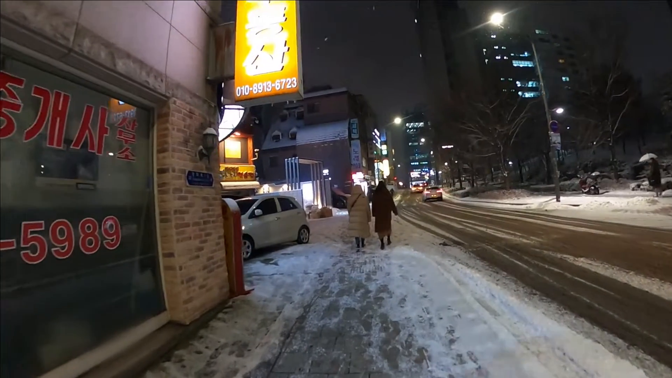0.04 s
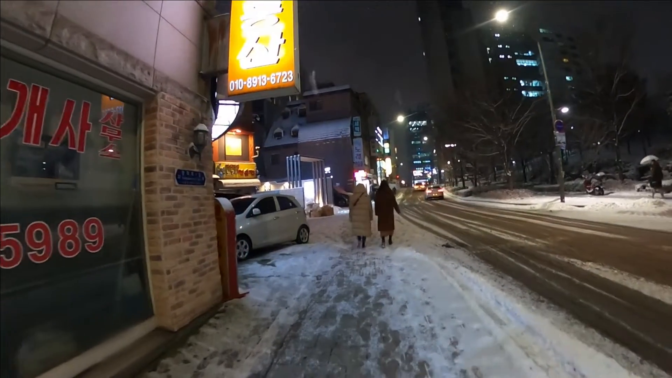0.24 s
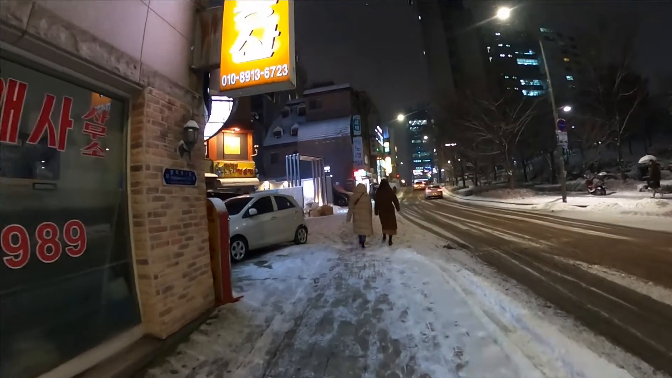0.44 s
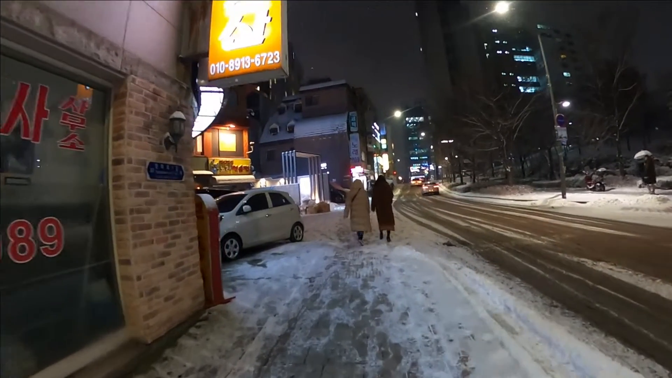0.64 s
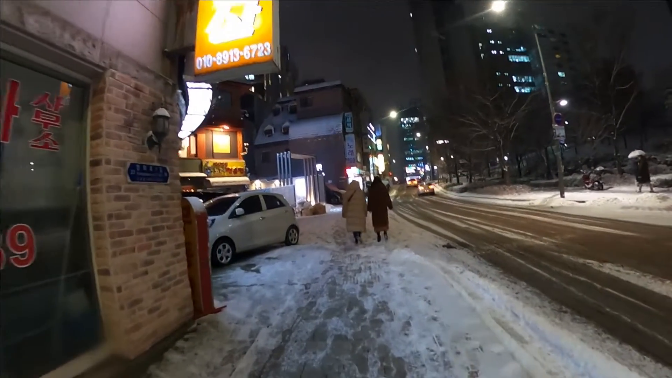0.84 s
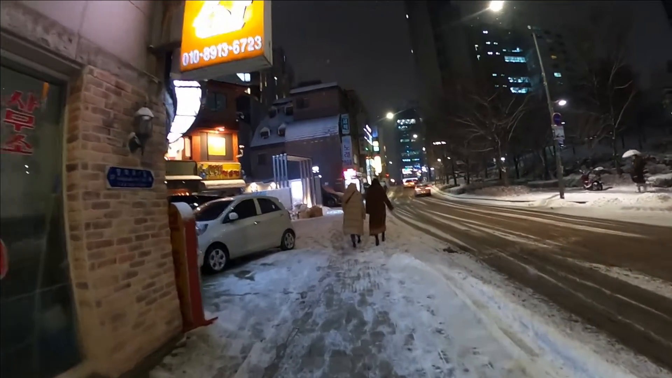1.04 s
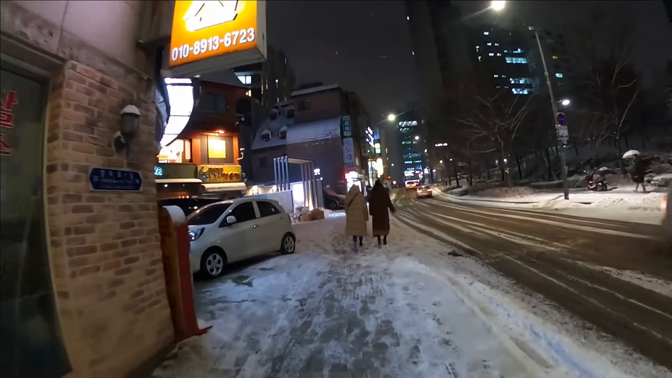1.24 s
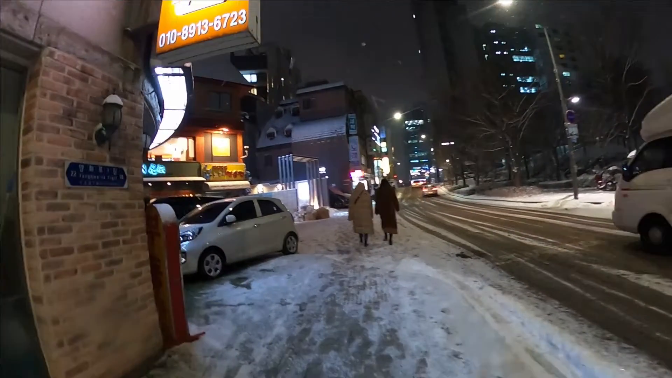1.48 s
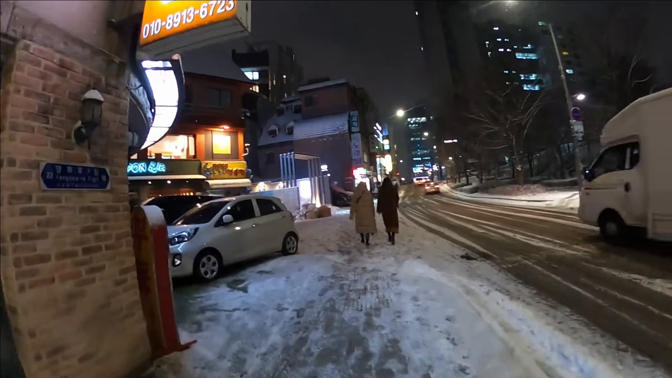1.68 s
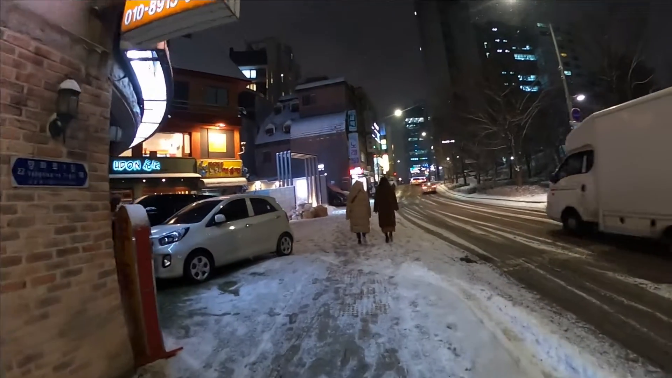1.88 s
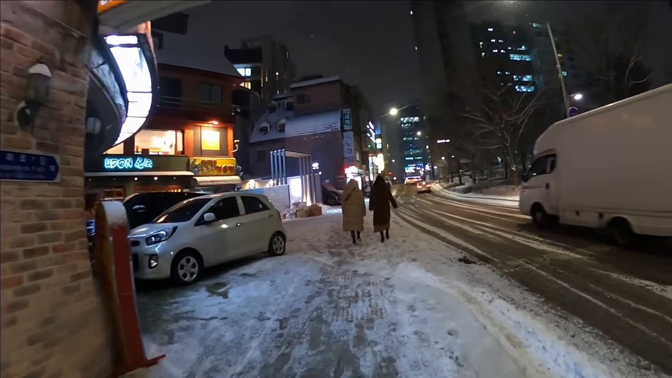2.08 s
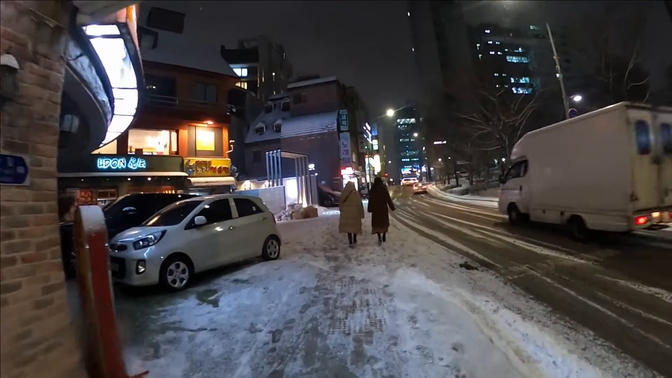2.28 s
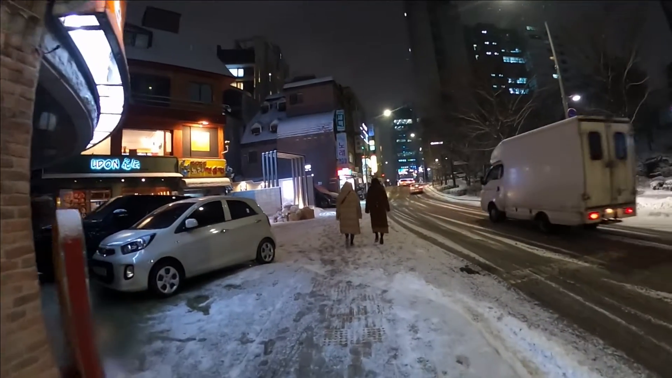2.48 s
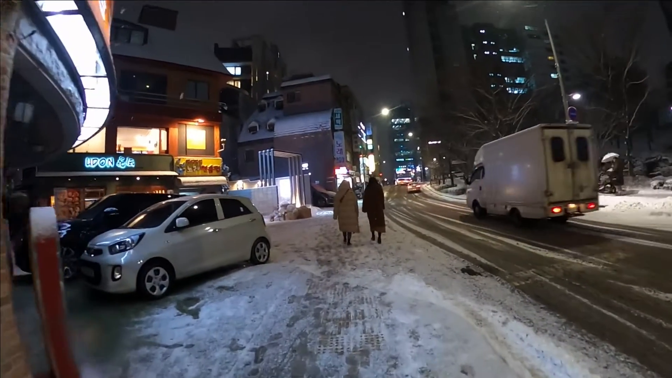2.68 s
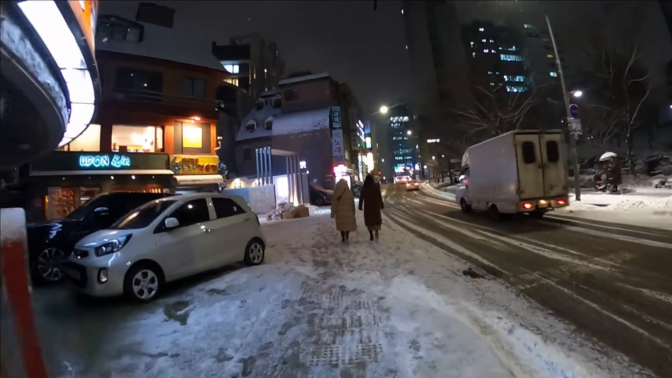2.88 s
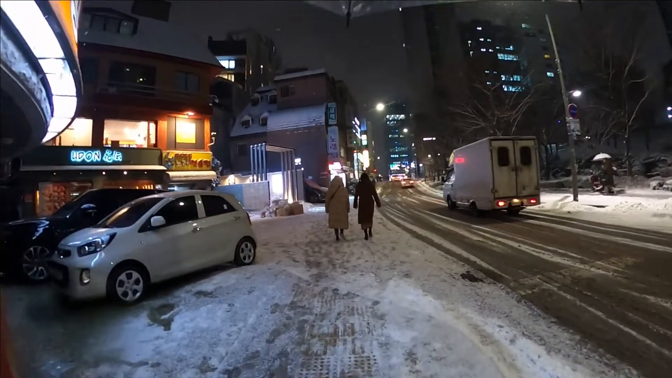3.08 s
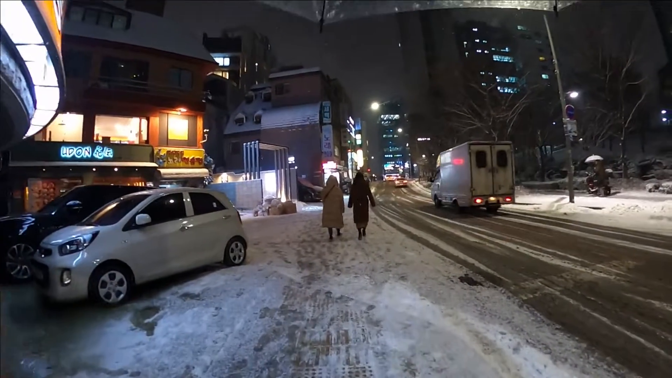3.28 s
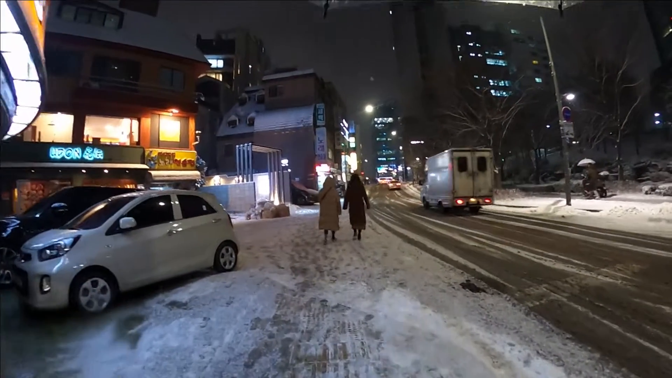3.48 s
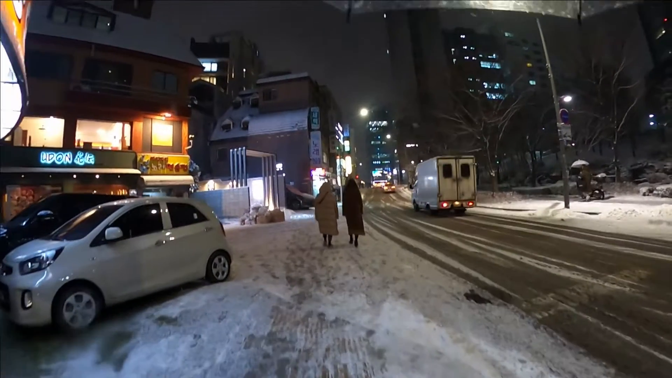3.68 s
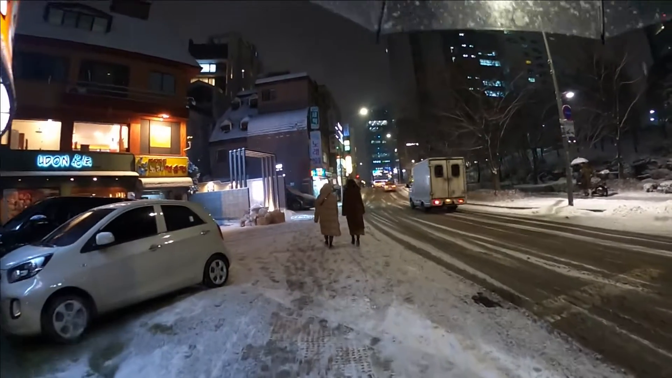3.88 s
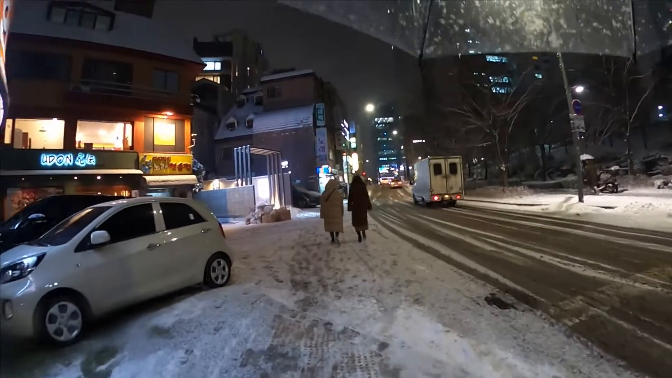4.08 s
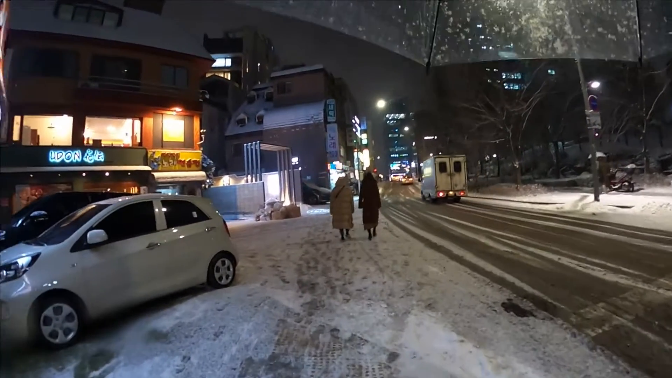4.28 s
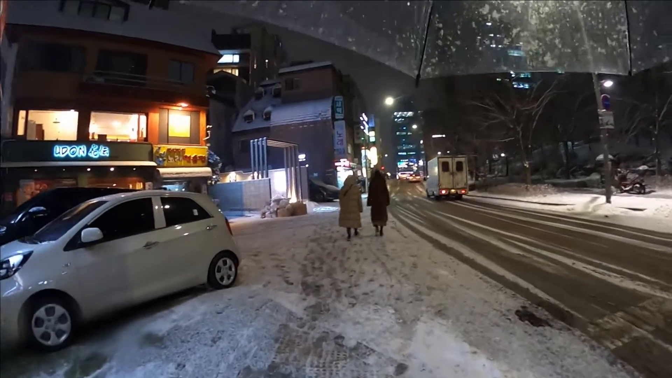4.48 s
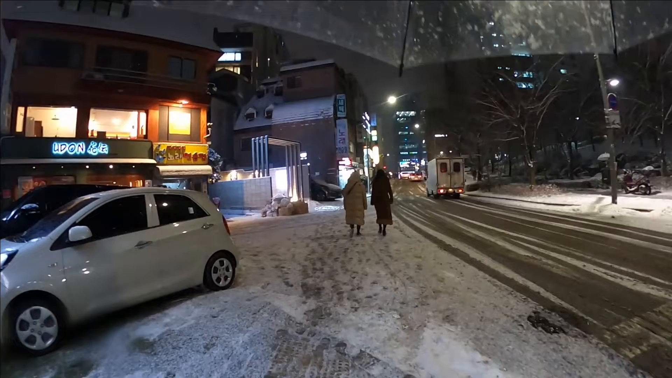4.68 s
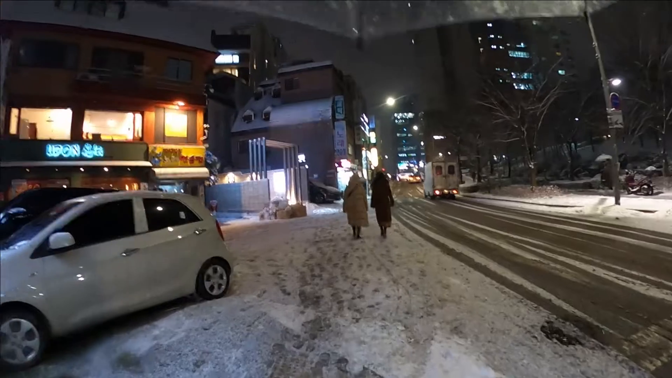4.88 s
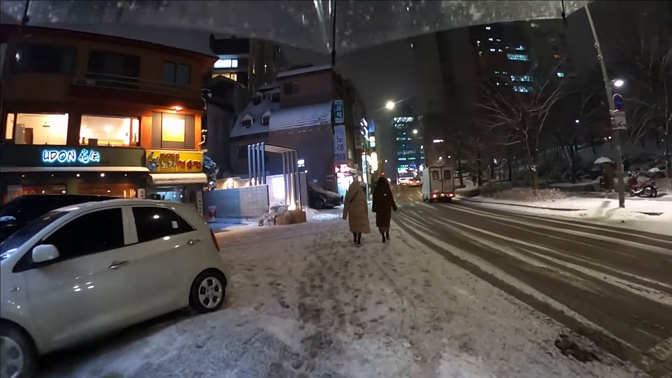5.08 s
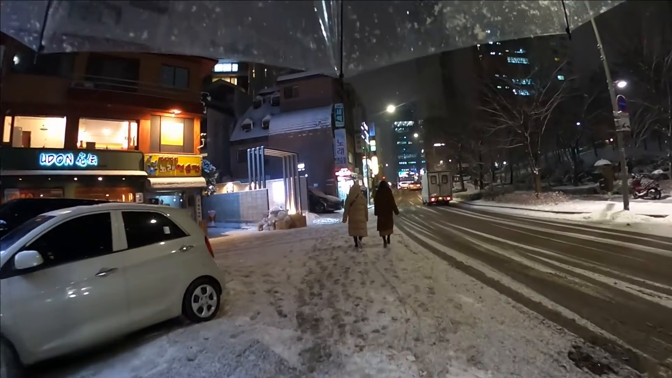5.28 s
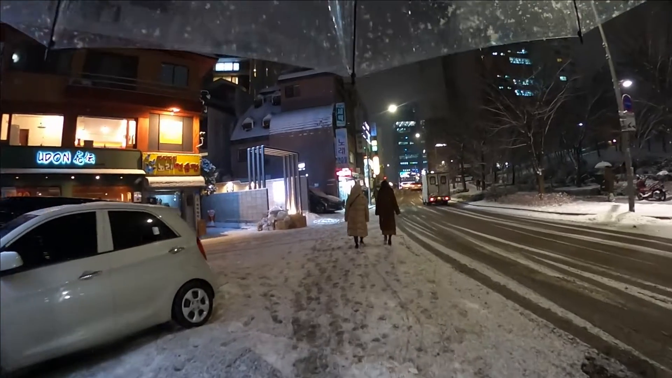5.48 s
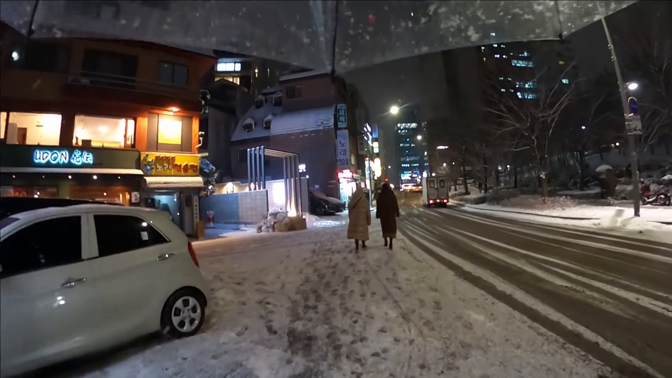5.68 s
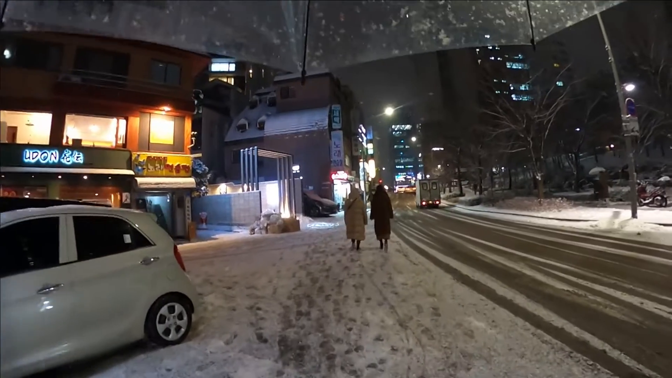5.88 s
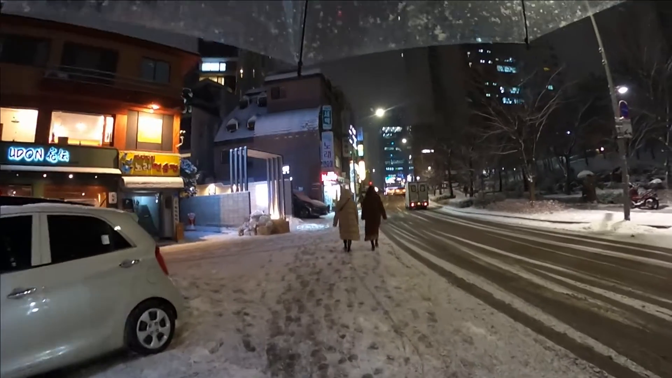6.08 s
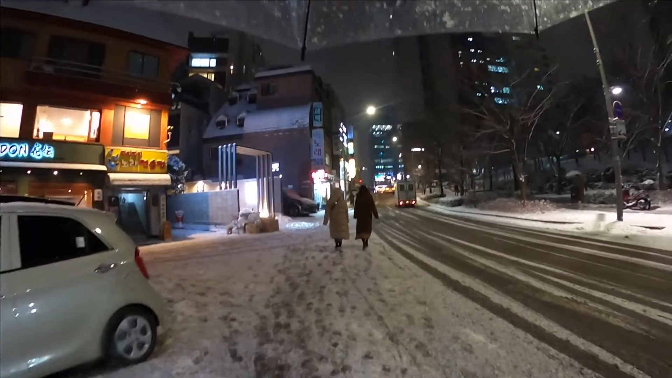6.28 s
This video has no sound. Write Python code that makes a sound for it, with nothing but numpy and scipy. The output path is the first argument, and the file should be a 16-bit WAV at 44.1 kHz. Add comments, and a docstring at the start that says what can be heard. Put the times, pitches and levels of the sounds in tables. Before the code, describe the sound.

Heard from a walker's stereo microphone outdoors: broad, bright tyre spray with slush spatter and a low engine throb, loud for the first two seconds and leaning right. Low wind thumps mark the pass, then everything quickly dulls and narrows to a distant rolling drone. Gusts rumble softly, fabric swishes barely, a sign buzzes faintly, and a hollow clattering bang comes from the truck ahead late on.

```python
"""On a slushy city street at night a box truck passes a walker and drives off into the distant traffic.
Shaped noise makes the tyres' roar and spray, with blips and short noise bursts for flying slush. Harmonic
orders make the engine, a wavering tone the tyre drone, and resonant noise the running gear. Low noise
is wind on the microphone, soft noise strokes are a coat, and faint harmonics are a lit shop sign's buzz.
Dull thuds mark ruts; further on, decaying modes and noise make the cargo box bang over a bump."""
import sys
import numpy as np
from scipy import signal
from scipy.fft import rfft, irfft, next_fast_len
from scipy.io import wavfile
from scipy.ndimage import uniform_filter1d

SR = 44100
rng = np.random.default_rng(int(sys.argv[2]) if len(sys.argv) > 2 else 0)


def int16_out(signal):
    """Quantize to a 16-bit WAV file."""
    q = np.round(np.clip(np.atleast_2d(signal).T, -1, 1) * 32767)
    wavfile.write(sys.argv[1], SR, q.astype(np.int16))


N = 279592
TIME = np.arange(N) / SR
# frames and bins of the time-frequency noise: 256-sample hop, 1024-sample window
FRAME_S = np.arange(N // 256 + 5) * 256 / SR
BIN_HZ = np.fft.rfftfreq(1024, 1 / SR)

# road noise spectra, truck near, driving off and far away: frequency_hz, relative_density_db (per Hz)
NEAR_SPECTRUM = [(100, -18), (200, 0), (290, -13.5), (450, -6.5), (560, -8.5), (780, -11.5), (960, -12.5),
                 (1130, -9), (1940, -11), (3000, -14.5), (5300, -22.5), (7400, -23.5), (10000, -40.5),
                 (15500, -60)]
LEAVING_SPECTRUM = [(100, -5.5), (220, 2), (320, -5.5), (540, -6), (700, -13.5), (940, -9), (1030, -12),
                    (1700, -10), (2250, -18.5), (3600, -21), (5200, -24.5), (6500, -30), (9000, -42),
                    (15500, -61)]
FAR_SPECTRUM = [(100, -2), (200, 15), (250, 0.5), (310, -9), (430, -12.5), (560, -6), (700, -1), (1600, -7),
                (2300, -7.5), (3300, -18.5), (5400, -38.5), (7200, -34), (10000, -52), (15500, -65)]
# blend of those spectra: time_s, stage (0 near, 1 driving off, 2 far away)
DISTANCE_STAGE = [(0, 0.076), (1.85, 0), (2.45, 0.87), (3.3, 1.15), (4.3, 1.35), (5.1, 1.14)]
# stereo difference of the road noise: frequency_hz, side_db
SIDE_SPECTRUM = [(200, -38), (500, -4), (850, -11), (1100, -8), (1500, 8), (2400, -0.5), (8000, -3.5),
                 (15000, -9)]
# its narrowing in time: time_s, width_db; and share taken by each pitch: frequency_hz, share (ratio)
WIDTH_CURVE = [(0, -5), (2.05, -5.5), (2.4, -11), (3.5, -43)]
NARROWING_SHARE = [(200, 4.7), (1200, 2.4), (3000, 1.06), (8000, 0.42)]
# surfaces near the walker: start_s, end_s, echo_delay_ms, echo_share (ratio, negative = inverted)
REFLECTORS = [(-0.5, 0.84, 2.17, -0.23), (4.5, 8, 0.64, 0.06)]
# bands that ring hollow, or dull if negative: start_s, end_s, centre_hz, width_hz, gain_db (at centre)
HOLLOW_BANDS = [(-2.5, 0.5, 2980, 180, 3), (-2.5, 0.62, 2620, 200, 3.5), (-0.5, 0.9, 8500, 900, 2.5),
                (-1, 0.8, 5000, 900, 1.5), (1.5, 2.8, 13500, 3500, -2.5), (-4, 2.5, 6300, 400, 2.5),
                (1.5, 2.7, 9500, 4700, -4), (3.8, 4.8, 4850, 330, 6), (2, 2.53, 2040, 450, -5.5),
                (2, 2.5, 1640, 300, 2), (4, 5.8, 4480, 300, -3.5), (3.5, 4.6, 3100, 410, 2),
                (2.5, 4.4, 2650, 370, -2), (3, 4.95, 630, 200, 4), (4.5, 8, 6200, 1800, -3),
                (3.9, 4.2, 15000, 3500, -3), (5.5, 8, 2620, 600, 1.5)]
# passes of each sound, 1 / distance: level_db (alongside), alongside_from_s, alongside_until_s,
# approach_s (time before that at twice the distance), recede_s (time after that at twice the distance)
ROAR_PASS = (-30, 1.35, 1.96, 2, 0.1753)
SPRAY_PASS = (-29, 0.81, 1.9321, 1.0, 0.156)
ENGINE_PASS = (-28, 0.65, 1.03, 1.5, 0.16)
DRONE_PASS = (-32, 1.22, 1.96, 0.03, 0.21)
SLIPSTREAM_PASS = (-29, 1.15, 2, 0.5, 0.24)
# steady levels in the distant traffic (dB)
FAR_ROAR_DB, FAR_SPRAY_DB, FAR_DRONE_DB, FAR_GEAR_DB = -50.5, -56.5, -57.5, -59.5
# swells of the distant traffic, as a far car passes: peak_s, length_s, level_db (relative to the steady level)
FAR_SWELLS = [(4.03, 0.95, -2), (5.5, 0.32, -13), (6.25, 0.32, -9.5)]
# unevenness of the hiss: slow colour from street echoes, spray surges, coarse grain (dB rms)
DRIFT_DB, SURGE_DB, GRAIN_DB = .85, .15, .6
# engine speed: time_s, firing_rate_hz
FIRING_RATE = [(0, 94), (.65, 94.5), (1.15, 96.5), (2.1, 97.5), (6.3, 92)]
# engine orders: order (multiple of the firing rate), relative_level_db
ENGINE_ORDERS = [(.5, -5.5), (1, 1), (1.5, -15.5), (2, -4), (2.5, -13), (3, -19), (3.5, -30), (4, -29),
                 (6, -16)]
# from behind, the cargo box screens the engine
ENGINE_FADE_FROM_S, ENGINE_FADE_DB_PER_S = 1.8, 3.5
# drone of the rolling tyres: time_s, pitch_hz
DRONE_PITCH = [(0, 166), (2.3, 166.7), (3.7, 175.3), (6.34, 171.8)]
# stretches of road that excite the drone: peak_s, length_s, level_db
DRONE_SWELLS = [(1.81, 0.39, -33), (2.9, 0.36, -46), (3.13, .12, -45.5), (3.52, 0.47, -45),
                (3.88, 0.41, -43.5), (5.76, 0.6, -43.5), (6.22, 0.49, -48)]
# running gear, each part heard best from its own angle: pitch_hz, width_hz, level_db, loudest_from_s, until_s
GEAR_MODES = [(79, 35, -35, 1, 1.76), (332, 20, -42, 0.96, 2.22), (403, 20, -43.5, 1.06, 1.54),
              (504, 16, -45, 1.4, 1.7), (539, 18, -38.5, 1.38, 2.04), (578, 30, -40, 1.05, 1.46)]
GEAR_APPROACH_S, GEAR_RECEDE_S = 0.35, .2
# gear that rings on from afar: pitch_hz, width_hz, relative_level_db
FAR_GEAR_MODES = [(76.5, 39, -7), (330, 25, -9.5), (407, 28, -13), (544, 16, -2.5), (580, 28, 0.5)]
# share of the drone swells in the far gear, and the time from the start at which it has halved
GEAR_SHARE_DB, GEAR_FADE_S = -3.5, 3.8
# wind spectrum: frequency_hz, relative_density_db (per Hz)
WIND_SPECTRUM = [(8, -9), (20, -3), (35, 1.5), (55, -0.5), (80, -3.5), (105, -8), (140, -9.5), (220, -17),
                 (350, -30), (700, -33.5), (2000, -95)]
# breeze between gusts: time_s, level_db
BREEZE = [(0, -42), (2.6, -51), (2.85, -48), (3.15, -49.5), (3.3, -40), (4.15, -45), (4.7, -42),
          (4.85, -60), (5.1, -44), (5.3, -52), (5.5, -44.5), (5.9, -48), (6.34, -43.5)]
# gusts common to both ports: peak_s, length_s, level_db
GUSTS = [(.2, .2, -33.5), (.55, 0.59, -28.5), (2.17, 0.15, -30), (3.24, 0.096, -34), (3.46, 0.39, -33.5),
         (3.92, 0.25, -28.5), (4.31, .06, -35.5), (4.38, .13, -38.5), (4.58, 0.19, -28.5),
         (4.71, 0.11, -35), (4.94, .06, -39.5), (5.03, 0.13, -35.5), (5.65, .35, -47)]
# buffets of opposite sign at the two ports: peak_s, length_s, level_db
BUFFETS = [(.466, 0.036, -29), (.597, 0.052, -34.5), (1.838, .044, -24), (1.961, 0.051, -17),
           (2.158, 0.03, -32), (2.273, 0.027, -27)]
# slaps of slush thrown by the wheels: start_s, level_db (before the envelope), t60_s, pitch_hz
SLAPS = [(.163, -23, .04, 2370), (.227, -26, .03, 2590), (.298, -25, .03, 2740), (.329, -24, .03, 1130),
         (.677, -23, .025, 2010), (.792, -23.5, .03, 2290), (.838, -21, .04, 2620), (.898, -24, .03, 1870),
         (.937, -23, .03, 2550), (1.164, -23.5, .03, 2210), (1.229, -24, .03, 3250),
         (1.255, -23.5, .04, 1800), (1.511, -16, .035, 1550), (1.582, -21, .03, 2440),
         (1.609, -22, .025, 1350), (1.945, -20, .035, 1350), (2.019, -17.5, .025, 1620),
         (2.085, -27, .04, 2000), (2.135, -25.5, .05, 2300), (2.221, -31, .06, 1400),
         (2.381, -22, .035, 1400), (4.318, -39.5, .04, 2100), (4.327, -37.5, .04, 2000),
         (4.473, -33, .022, 1400), (4.918, -44, .16, 1550)]
# wheels in ruts: peak_s, length_s, pitch_hz, level_db
THUDS = [(1.97, 0.12, 94, -26.5), (3.02, 0.072, 246, -38)]
# coat swishes: peak_s, length_s (nominal), level_db
SWISHES = [(3.69, 0.21, -56.5), (4.45, 0.14, -60.5), (5.487, 0.33, -57.5), (5.665, 0.07, -63),
           (6.263, .27, -58)]
# cloth spectrum: frequency_hz, relative_density_db (per Hz)
CLOTH_SPECTRUM = [(1500, -11), (4000, 5), (6500, -3), (8500, -9), (10500, -13), (13000, -19), (15500, -22)]
# swells of the sign's lines: peak_s, length_s, level_db, harmonic (multiple of the buzz rate)
SIGN_SWELLS = [(4.57, .3, -53.5, 10), (4.93, .26, -50.5, 10), (5.56, .44, -52, 10), (5.9, .4, -56, 10),
               (6.24, .4, -54.5, 10), (5.8, .8, -60, 9), (6.28, .2, -59.5, 9), (5.85, .6, -63, 11),
               (5.7, 1.1, -61.5, 13), (6.12, .3, -61, 14)]
BUZZ_HZ = 120
# jolts of the cargo box: start_s, level_db (before panel and clatter gains), tilt_db_per_octave
BANGS = [(4.615, -43.5, 1), (4.629, -32.2, 1.2), (4.640, -29.5, -3.5), (4.661, -35, 0), (4.675, -39.5, 1),
         (4.694, -40.5, 1.5), (4.718, -39, 0.5), (4.741, -43, 1)]
# panels of the cargo box: pitch_hz, relative_level_db, t60_s
BOX_MODES = [(279.6, -2.5, 0.14), (388, -15, 0.13), (455, -7, 0.06), (569, -8, 0.44), (710, -14, 0.086),
             (795, 1.5, .08), (958, -6, 0.23), (1145, -9, 0.27), (1310, -5.5, 0.21), (1620, -13.5, .3),
             (1860, -14, 0.29), (2030, -16, 0.2), (2920, -13.5, .25)]
# clatter of loose doors and load: frequency_hz, relative_density_db (per Hz)
CLATTER_SPECTRUM = [(100, -12), (260, -2), (600, -1.5), (920, 1), (1200, -10), (2000, -11), (3400, -14.5),
                    (5000, -27), (9000, -42), (15000, -62)]
# the microphone's top octave: frequency_hz, gain_db
MICROPHONE_RESPONSE = [(10500, 1), (11300, 0), (12400, 1), (13800, -1), (15500, -6)]
EDGE_HZ = 15400


def amp(db):
    """Decibel law: 20 dB is a tenfold amplitude."""
    return 10 ** (np.asarray(db) / 20)


def unit(x):
    """Power normalisation: scales to rms 1."""
    return x / np.sqrt(np.mean(x ** 2) + 1e-20)


def follow(rows, t=TIME):
    """Linear interpolation: the second column of a curve table at times t."""
    seconds, values = np.transpose(rows)
    return np.interp(t, seconds, values)


def colour(points, hz):
    """Spectral envelope: a table interpolated on a log-frequency axis."""
    f, db = np.transpose(points)
    return np.interp(np.log(hz + 1), np.log(f + 1), db)


def noise(gain):
    """Spectral shaping: Gaussian noise of rms 1 with the spectrum gain(Hz)."""
    size = next_fast_len(N, real=True)
    hz = np.fft.rfftfreq(size, 1 / SR)
    spectrum = rng.standard_normal(len(hz)) + 1j * rng.standard_normal(len(hz))
    return unit(irfft(gain(hz) * spectrum, size)[:N])


def waver(rate):
    """Slow random modulation: noise of rms 1, mostly below rate in Hz."""
    return noise(lambda hz: np.exp(-(hz / rate) ** 2))


def ringing(pitch_hz, width_hz):
    """Resonance: noise of rms 1 concentrated round one pitch."""
    return noise(lambda hz: 1 / (1 + ((hz - pitch_hz) / (0.5 * width_hz)) ** 2))


def patches(frames, bins):
    """Correlated fluctuation: a random field of rms 1, smoothed over frames and bins."""
    field = rng.standard_normal((len(FRAME_S), len(BIN_HZ)))
    field = uniform_filter1d(field, max(1, int(frames)), axis=0)
    return unit(uniform_filter1d(field, max(1, int(bins)), axis=1))


def hiss(gain):
    """Short-time synthesis: noise shaped by a gain in each frame and bin."""
    z = gain * (rng.standard_normal(gain.shape) + 1j * rng.standard_normal(gain.shape))
    return signal.istft(z.T, nperseg=1024, noverlap=768)[1][:N] * np.sqrt(3 / 4)


def band_db(field_db, lo, hi):
    """Power summation: the level of one band in each frame."""
    inside = (BIN_HZ > lo) & (BIN_HZ < hi)
    return 10 * np.log10((amp(field_db[:, inside]) ** 2).sum(1))


def between(start, end):
    """Linear crossfade: half a second in round start and out round end."""
    return np.clip(np.minimum(FRAME_S - start, end - FRAME_S) * 2 + .5, 0, 1)


def passing(row, t=TIME):
    """Spherical spreading: pressure falls as 1 / distance before and after the pass."""
    db, arrive, leave, approach_s, recede_s = row
    distance = 1 + np.maximum(arrive - t, 0) / approach_s + np.maximum(t - leave, 0) / recede_s
    return amp(db) / distance


def swells(rows, t=TIME):
    """Amplitude modulation: a sum of cosine arches."""
    return sum(amp(db) * np.cos(np.pi * np.clip((t - s) / length, -.5, .5)) for s, length, db in rows)


def road_db(row, far_db, t=TIME):
    """Incoherent addition: the truck's tyres and the distant traffic sum in power."""
    far = amp(far_db) * np.hypot(1, swells(FAR_SWELLS, t))
    return 20 * np.log10(np.hypot(passing(row, t), far))


def struck(s, t60, rise_s):
    """Impulsive excitation: a quick rise, then exponential decay."""
    age = np.maximum(TIME - s, 0)
    return (1 - np.exp(-age / rise_s)) * amp(-60 * age / t60)


def reflections():
    """Comb filtering: echoes from the shop window, and later the umbrella, colour the tyre noise."""
    gain = 1
    for start, end, delay_ms, share in REFLECTORS:
        comb = np.cos(2 * np.pi * BIN_HZ * delay_ms / 1000)
        comb = comb * np.exp(-(BIN_HZ * delay_ms / 9000) ** 2)  # weaker towards the treble
        gain = gain * (1 + share * np.outer(between(start, end), comb))
    for start, end, hz, width, db in HOLLOW_BANDS:
        bell = 1 / (1 + (2 * (BIN_HZ - hz) / width) ** 2)
        gain = gain * amp(db * np.outer(between(start, end), bell))
    return gain


def tyres(patchy_db=0.65, splash_db=0.5, right_share=0.22):
    """Broadband friction noise: wet tyres roar and spray, dulling with distance as lumps of slush flutter."""
    stage = np.clip(follow(DISTANCE_STAGE, FRAME_S)[:, None], 0, 2)
    spectra = [NEAR_SPECTRUM, LEAVING_SPECTRUM, FAR_SPECTRUM]
    field = sum(np.maximum(1 - abs(stage - k), 0) * colour(s, BIN_HZ) for k, s in enumerate(spectra))
    # the tracks set the levels of these two bands
    roar = road_db(ROAR_PASS, FAR_ROAR_DB, FRAME_S) - band_db(field, 900, 2000)
    spray = road_db(SPRAY_PASS, FAR_SPRAY_DB, FRAME_S) - band_db(field, 2500, 7000)
    treble = colour([(1600, 0.19), (3000, 0.92)], BIN_HZ)  # share of spray at each pitch
    field = field + np.outer(roar, 1 - treble) + np.outer(spray, treble)
    field = field + patchy_db * patches(frames=6.3, bins=9.2)
    field = field + splash_db * patches(frames=4.6, bins=130)
    field = field + DRIFT_DB * patches(frames=55, bins=5)
    gain = amp(field) * reflections()

    width_db = np.minimum(follow(WIDTH_CURVE, FRAME_S), 0)
    narrowing = np.outer(width_db, colour(NARROWING_SHARE, BIN_HZ))
    mid = hiss(gain)
    side = hiss(gain * amp(narrowing + colour(SIDE_SPECTRUM, BIN_HZ)))
    # the road lies to the right: this band leans that way
    bright_band = signal.butter(3, [1000, 5500], "band", fs=SR, output="sos")
    bright = signal.sosfiltfilt(bright_band, mid)
    side = side - right_share * bright * amp(follow(WIDTH_CURVE))

    # close by, the spray comes in surges and coarse clumps
    nearness = np.clip(1.4 - follow(DISTANCE_STAGE), 0, 1)
    clumps_db = (SURGE_DB * waver(16) + GRAIN_DB * waver(220)) * nearness
    return np.array([mid + side, mid - side]) * amp(clumps_db)


def splats(level_db=-41.5, tilt_db=-3, dulling_db=-4, count=120):
    """Random impact trains: lumps and drops of slush land on the road, each a six-cycle blip."""
    out = np.zeros((2, N))
    width = np.minimum(amp(follow(WIDTH_CURVE)), 1)
    stage = follow(DISTANCE_STAGE)
    for hz in np.geomspace(1100, 6000, num=16):
        cycles = np.arange(int(6 * SR / hz)) * hz / SR
        blip = np.sin(2 * np.pi * cycles) * np.hanning(len(cycles)) * np.sqrt(hz / 1000)
        when, weight, place = rng.random((count, 3)).T
        at = (when * N).astype(int)
        size_db = 5 * np.minimum(-np.log(weight), 3.5)
        # small, high drops are weaker, and are lost first with distance
        size_db = size_db + (tilt_db + dulling_db * stage[at]) * np.log2(hz / 1000)
        pan = (2 * place - 1) * width[at]
        train = np.zeros((2, N))
        train[:, at] = amp(size_db) * np.sqrt([1 + pan, 1 - pan])
        out += signal.oaconvolve(train, blip[None], axes=1)[:, :N]
    spray = road_db(SPRAY_PASS, FAR_SPRAY_DB)
    return amp(level_db + spray - spray.max()) * unit(out)


def engine(jitter=0.01197):
    """Periodic combustion: orders of the firing rate, each throbbing with uneven firing."""
    hz = follow(FIRING_RATE)
    turns = np.cumsum(hz * (1 + jitter * waver(11.5))) / SR
    out = 0
    for order, order_db in ENGINE_ORDERS:
        throb = .85 + .5 * (waver(14) + 1j * waver(14))
        tone = np.exp(2j * np.pi * (order * turns + rng.random()))
        out = out + amp(order_db) * (throb * tone).real
    screening_db = -ENGINE_FADE_DB_PER_S * np.maximum(TIME - ENGINE_FADE_FROM_S, 0)
    return passing(ENGINE_PASS) * amp(screening_db) * out


def running_gear(jitter=0.013, octave_db=-13, patchy_db=2):
    """Forced resonance: tyres drone on a wavering note, the exhaust booms below, the drive train rings above."""
    hz, swell = follow(DRONE_PITCH), swells(DRONE_SWELLS)
    phase = 2 * np.pi * np.cumsum(hz * (1 + jitter * waver(19.7))) / SR
    throb = .9 + .4 * waver(22) + .25j * waver(14)
    level = np.hypot(passing(DRONE_PASS), amp(FAR_DRONE_DB)) + swell
    drone = level * (throb * (np.exp(1j * phase) + amp(octave_db) * np.exp(2j * phase))).real

    shared_swell = amp(GEAR_SHARE_DB) * swell / (1 + TIME / GEAR_FADE_S)
    far_level = np.hypot(amp(FAR_GEAR_DB), shared_swell)
    far = sum(amp(db + 2 * waver(7)) * ringing(f, width) for f, width, db in FAR_GEAR_MODES)

    near = 0
    for f, width, db, arrive, leave in GEAR_MODES:
        part = unit(amp(patchy_db * waver(3.9)) * ringing(f, width))
        near = near + passing((db, arrive, leave, GEAR_APPROACH_S, GEAR_RECEDE_S)) * part
    return drone + near + far_level * unit(far)


def wind(side_db=-15):
    """Turbulent pressure: slipstream, breeze and gusts rumble in both ports; buffets are opposite in sign."""
    common, apart = (noise(lambda hz: amp(colour(WIND_SPECTRUM, hz))) for _ in range(2))
    slipstream, breeze = passing(SLIPSTREAM_PASS), amp(follow(BREEZE))
    rumble = np.sqrt(slipstream ** 2 + breeze ** 2 + swells(GUSTS) ** 2)
    side = (rumble * amp(side_db + follow(WIDTH_CURVE)) + swells(BUFFETS)) * apart
    return np.array([rumble * common + side, rumble * common - side])


def slaps(width_share=0.66, rise_s=0.0025):
    """Damped impact: big lumps of slush hit the road in short, wet bursts round one pitch."""
    out = sum(amp(db) * struck(s, t60, rise_s) * ringing(hz, width_share * hz) for s, db, t60, hz in SLAPS)
    # snow and distance swallow their top end
    return signal.sosfilt(signal.butter(4, 4800, fs=SR, output="sos"), out)


def thuds():
    """Low-frequency impact: wheels drop into ruts, sounding as narrow-band noise."""
    return sum(swells([(s, length, db)]) * ringing(hz, 35) for s, length, hz, db in THUDS)


def coat(catch_db=1.5):
    """Sliding friction: fabric rubs itself with each stride, easing in and out and catching on its folds."""
    stroke = 0
    for s, length, db in SWISHES:
        stroke = stroke + amp(db) * np.exp(-np.pi * ((TIME - s) / (0.86 * length)) ** 2)
    cloth = noise(lambda hz: amp(colour(CLOTH_SPECTRUM, hz)))
    return stroke * amp(catch_db * waver(45)) * cloth


def shop_sign():
    """Mains harmonics: multiples of twice the mains rate swell as the walker moves through their echoes."""
    phase = rng.random(len(SIGN_SWELLS) * 2)
    out = 0
    for s, length, db, k in SIGN_SWELLS:
        echoes = .9 + .28 * (waver(9) + 1j * waver(9))
        line = np.exp(2j * np.pi * (k * BUZZ_HZ * TIME + phase[k]))
        out = out + swells([(s, length, db)]) * (echoes * line).real
    return np.sqrt(2) * out  # table levels are rms


def cargo_box(panels_db=-6, clatter_db=-1.5, clatter_t60=.1, rise_s=0.0026,
              echo_db=-14, echo_t60=0.85, crunch_db=2.5):
    """Modal vibration: each jolt rings the panels and shakes the load; house fronts add a short tail."""
    out = np.zeros(N)
    for s, db, tilt in BANGS:
        for hz, mode_db, t60 in BOX_MODES:
            tone = np.sin(2 * np.pi * (hz * TIME + rng.random()))
            level_db = db + panels_db + mode_db + tilt * np.log2(hz / 1000)
            out += amp(level_db) * struck(s, t60, rise_s) * tone
        clatter = noise(lambda hz: amp(colour(CLATTER_SPECTRUM, hz) + tilt * np.log2(hz / 1000 + .1)))
        clatter = unit(clatter * amp(crunch_db * waver(300)))
        envelope = struck(s, clatter_t60, rise_s) + amp(echo_db) * struck(s, echo_t60, 0.017)
        out += amp(db + clatter_db) * envelope * clatter
    # distance rounds off the top
    return signal.sosfilt(signal.butter(2, 8000, fs=SR, output="sos"), out)


def scene():
    """Superposition: the sounds of the street add linearly at the walker."""
    truck = tyres() + splats() + engine() + running_gear() + slaps() + thuds() + cargo_box()
    return truck + wind() + coat() + shop_sign()


def record(dry):
    """Linear filtering: the microphone's treble response, then the recorder's band limit."""
    size = next_fast_len(N + SR, real=True)
    response = amp(colour(MICROPHONE_RESPONSE, np.fft.rfftfreq(size, 1 / SR)))
    heard = irfft(rfft(dry, size) * response, size)[:, :N]
    band_limit = signal.firwin(511, EDGE_HZ, window=("kaiser", 9), fs=SR)
    return signal.oaconvolve(heard, band_limit[None], "same", axes=1)


dry = scene()
out = record(dry)
int16_out(out)
```